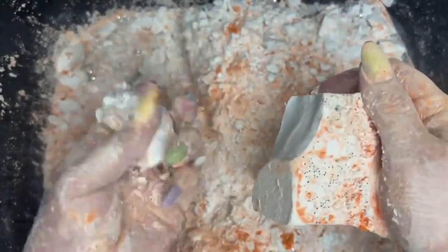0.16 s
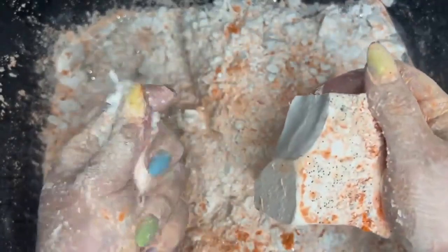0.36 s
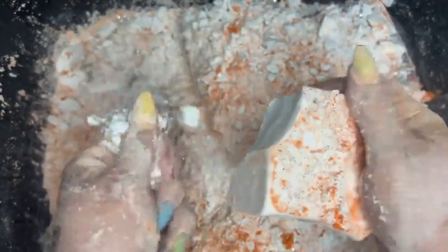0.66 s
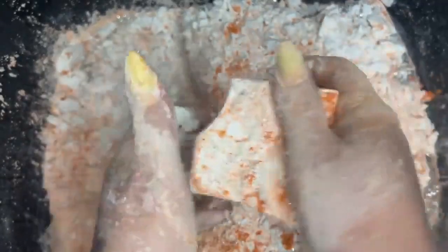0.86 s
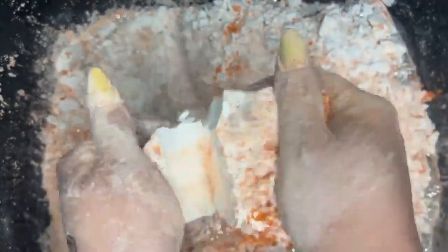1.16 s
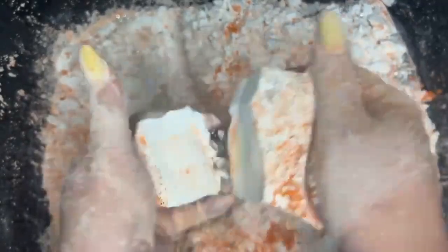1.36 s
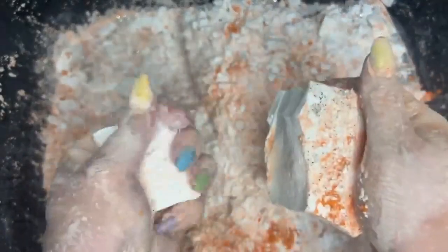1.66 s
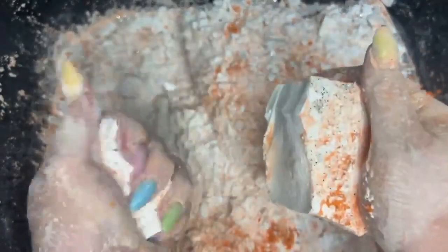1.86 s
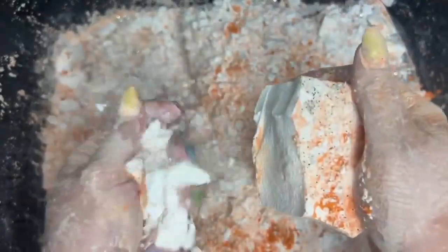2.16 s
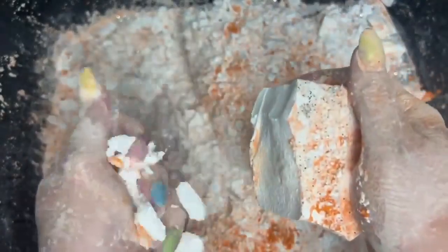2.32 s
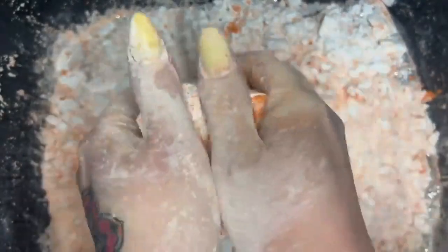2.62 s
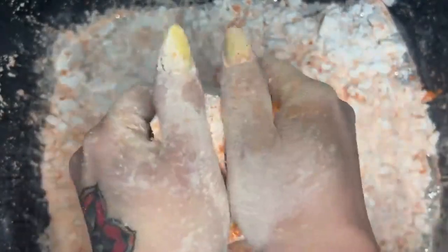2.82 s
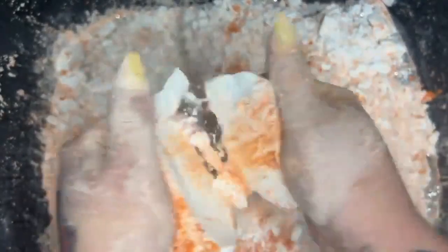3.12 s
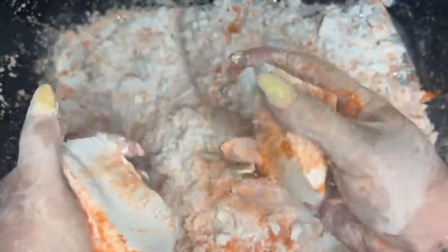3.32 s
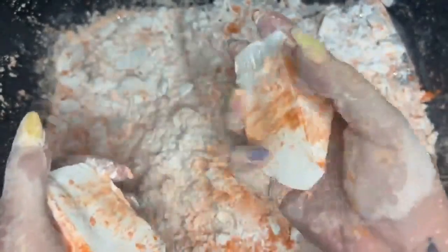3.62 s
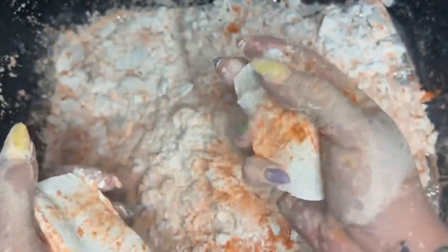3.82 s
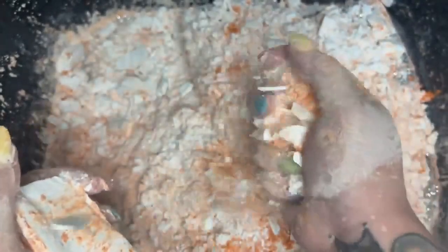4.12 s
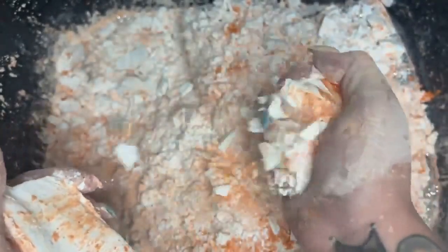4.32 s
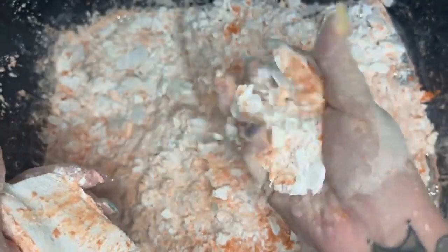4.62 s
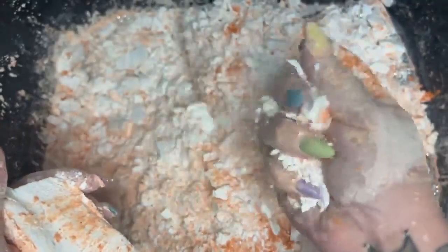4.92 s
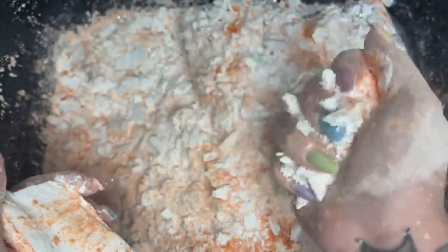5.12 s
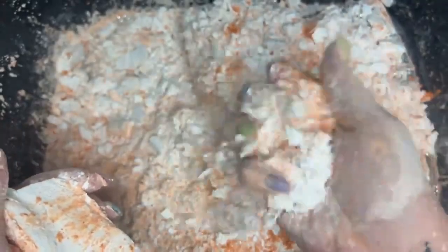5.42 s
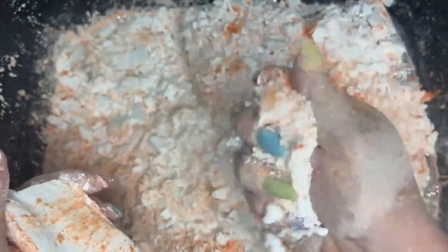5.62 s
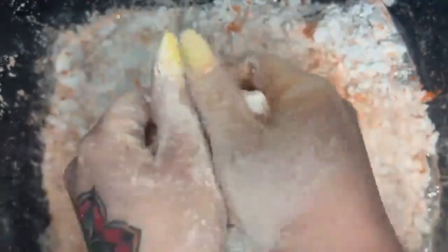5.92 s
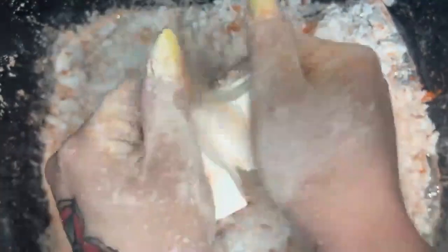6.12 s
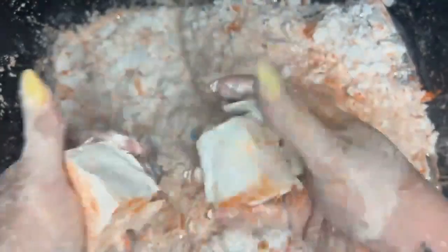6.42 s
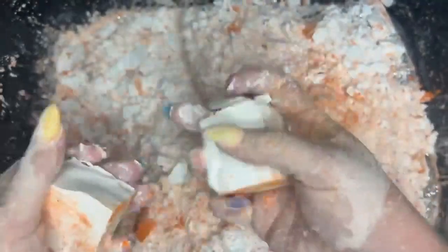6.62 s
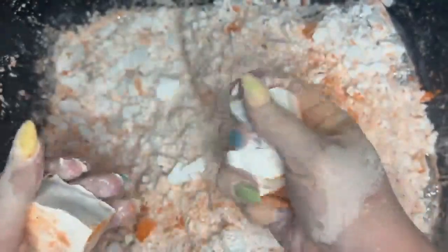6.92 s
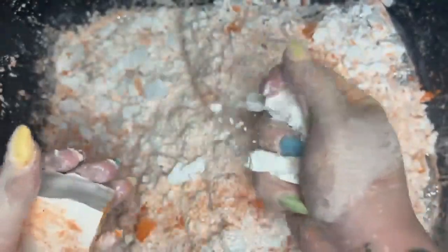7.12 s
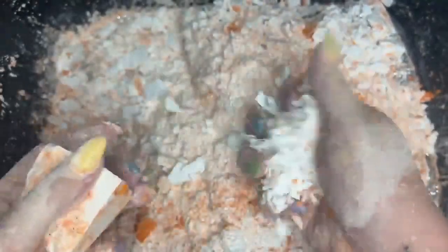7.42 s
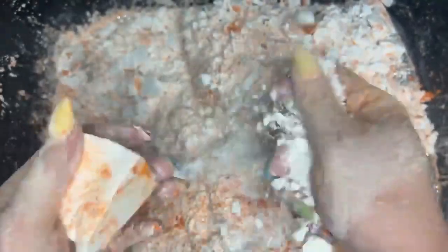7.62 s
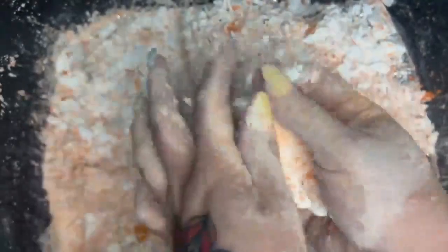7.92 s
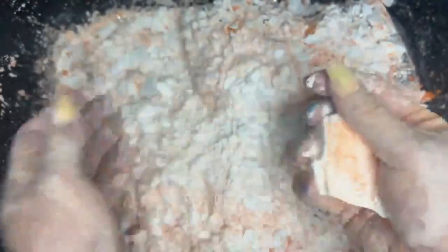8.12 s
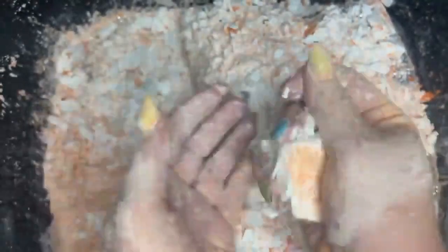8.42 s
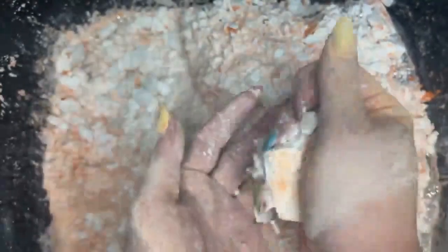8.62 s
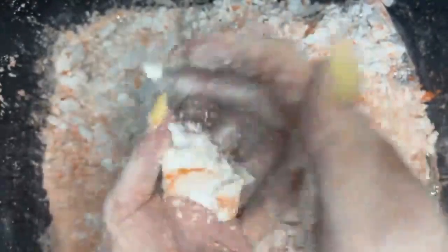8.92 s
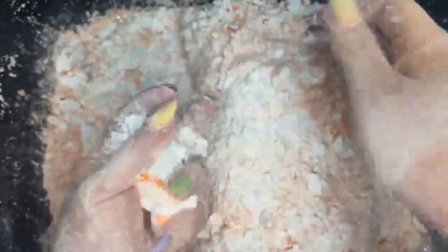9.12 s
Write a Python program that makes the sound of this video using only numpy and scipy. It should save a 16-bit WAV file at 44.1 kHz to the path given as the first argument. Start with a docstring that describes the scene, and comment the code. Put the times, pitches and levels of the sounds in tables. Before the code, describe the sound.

Close stereo sound of brittle chalk being crushed by hand. A few crunches open, a hard snap follows at a second and a half, then more squeezes, a dense crackling run near seven seconds and the sharpest crack just after eight. Powder grinds, skin hisses faintly on dust, and a fan hums low. The whole level dips very briefly four times. Small, nearly dry room.

```python
"""Dry chalk blocks snap and crush in two hands over a tray of powder, heard close in a small room.
Each fracture is a snap with a brief avalanche of smaller breaks that ring the fragment; damped thumps join.
Each squeeze swells and eases, grinding powder and breaking crumbs; faces stick and slip, and skin hisses.
A fan, moving air with narrow resonances, hums low throughout, and the whole level dips briefly four times."""
import sys
import numpy as np
from scipy import signal
from scipy.fft import rfft, irfft, next_fast_len
from scipy.io import wavfile
from scipy.ndimage import uniform_filter1d

SR = 44100
rng = np.random.default_rng(int(sys.argv[2]) if len(sys.argv) > 2 else 0)


def to_wav(s):
    """Save 16-bit WAV."""
    ch = np.atleast_2d(s).T  # columns
    pcm = np.round(np.clip(ch, -1, 1) * 32767)  # PCM
    wavfile.write(sys.argv[1], SR, pcm.astype(np.int16))


N = 408366
TIME = np.arange(N) / SR


def undb(db):
    """Logarithmic level: decibels become an amplitude gain."""
    return 10 ** (np.asarray(db) / 20)


def unit(x):
    """Normalisation of power: scale to rms 1."""
    return x / np.sqrt(np.mean(x ** 2) + 1e-20)


def decay(t, t60_s):
    """Exponential decay: 60 dB are lost in each t60."""
    return np.exp(-np.log(1000) * t / t60_s)


def shape(points, size):
    """Spectral envelope: gain of a (Hz, dB) curve at each bin of a transform, on a log frequency axis."""
    hz, db = np.transpose(points)
    bin_hz = np.arange(size // 2 + 1) * SR / size
    return undb(np.interp(np.log(bin_hz + 1), np.log(hz), db))


def colour(x, points):
    """Linear filtering: multiply the spectrum of a sound by an envelope."""
    size = next_fast_len(len(x))
    return irfft(rfft(x, size) * shape(points, size), size)[:len(x)]


def lowpass(x, hz):
    """Second-order causal low-pass."""
    return signal.sosfilt(signal.butter(2, hz, fs=SR, output="sos"), x)


def band(x, lo_hz, hi_hz, order=2):
    """Causal band-pass."""
    return signal.sosfilt(signal.butter(order, [lo_hz, hi_hz], "bp", fs=SR, output="sos"), x)


def split(x, edges_hz):
    """Complementary filtering: neighbouring zero-phase bands that sum back to the sound above the first edge."""
    above = []
    for hz in edges_hz:
        highpass = signal.butter(3, hz, "hp", fs=SR, output="sos")
        above.append(signal.sosfiltfilt(highpass, x))
    return [a - b for a, b in zip(above, above[1:] + [0])]


def ring(x, hz, width_hz):
    """Resonance: one mode, gain 1 at its centre."""
    return signal.lfilter(*signal.iirpeak(hz, hz / width_hz, fs=SR), x)


def flicker(per_s):
    """Slow random modulation: random levels joined smoothly, rms 1."""
    hold = max(int(SR / per_s), 1)
    steps = np.repeat(rng.standard_normal(N // hold + 1), hold)
    return unit(uniform_filter1d(steps, hold)[:N])


def ticks(per_s, scatter_db):
    """Poisson process: random clicks of very unequal size and either sign, rms 1."""
    sizes = undb(scatter_db * np.minimum(rng.exponential(size=N), 4))
    signs = rng.choice([-1, 1], N)
    return unit(sizes * signs * (rng.random(N) < per_s / SR))


# Stereo width. Each row: frequency in Hz, gain of the side sound in dB.
SIDE_WIDTH = [(110, -46), (190, -34), (330, -9.5), (580, -0.5), (1020, -3), (1800, -14.5), (3180, -5.5),
              (5600, -3.5), (9880, 0.5)]


def spread(mid, side):
    """Decorrelation: left and right from two unrelated sounds, with the bass kept in the centre."""
    return mid + colour(side, SIDE_WIDTH) * np.array([[1], [-1]])


def pan(left_minus_right_db):
    """Level difference between the channels: half the decibels to each, in opposite directions."""
    return undb(np.array([[left_minus_right_db], [-left_minus_right_db]]) / 2)


def add(out, s, sound, pan_db=0):
    """Superposition: mix a short sound in at its time and place."""
    i = int(s * SR)
    part = sound[..., :max(N - i, 0)]
    out[:, i:i + part.shape[-1]] += pan(pan_db) * part


# Spectrum of the fan's moving air. Each row: frequency in Hz, relative density in dB per Hz.
FAN_AIR = [(20, -31), (35, -17.5), (52, -4), (90, -4), (160, 0.5), (205, -8), (260, -8.5), (380, -10.5),
           (480, -14), (540, -17), (740, -22.5), (1050, -31.5), (1250, -31), (4000, -69)]
# Resonances of the fan's drone. Each row: frequency in Hz, width in Hz, rms level in dB.
FAN_DRONE = [(104.7, 5.5, -50), (121.6, 2.46, -45.5), (132.2, 3.94, -43.5), (180.4, 25, -52),
             (234.6, 24, -55), (298, 44, -53.5), (337.8, 41, -54), (452, 27, -62.5), (590.4, 23, -66),
             (901, 22, -71)]


def fan(air_db=-45, steady=0.33, slow_rate=500):
    """Broadband flow noise with narrowband resonances: noise-modulated carriers, their swings partly evened."""
    out = undb(air_db) * unit(colour(rng.standard_normal(N), FAN_AIR))
    slow_time = np.arange(0, next_fast_len(N) / SR, 1 / slow_rate)
    count = len(slow_time)
    for hz, width_hz, db in FAN_DRONE:
        narrow = signal.butter(2, width_hz / 2, fs=slow_rate, output="sos")
        sway = signal.sosfiltfilt(narrow, rng.standard_normal((2, 2 * count)))
        sway = sway[:, count // 2:][:, :count]  # away from the filter's ends
        sway = sway / np.hypot(*sway) ** steady
        a, b = (np.interp(TIME, slow_time, part) for part in sway)
        phase = 2 * np.pi * hz * TIME
        out = out + undb(db) * unit(a * np.cos(phase) + b * np.sin(phase))
    return out


# Spectrum the room gives back. Each row: frequency in Hz, gain in dB.
ROOM_COLOUR = [(150, -10.5), (500, 3.5), (1000, -3.5), (1700, -3.5), (2600, 1), (3400, 4), (4500, 1.5),
               (6500, 3.5), (9500, -3)]


def room_response(t60_s=0.5, treble_t60_s=0.36, early_db=-22.0, early_s=0.01, gap_s=0.0086, tail_db=-20,
                  size=22050):
    """Reverberant decay: early reflections build over a gap, then a tail whose treble dies sooner."""
    t = np.arange(size) / SR
    noise = colour(rng.standard_normal(size), ROOM_COLOUR)
    low, high = split(noise, edges_hz=[150, 4200])
    tail = low * decay(t, t60_s) + high * decay(t, treble_t60_s)
    early = noise * np.exp(-t / early_s) * np.clip(t / gap_s, 0, 1) ** 4
    return (undb(tail_db) * unit(tail) + undb(early_db) * unit(early)) / np.sqrt(2 * size)


def room(x):
    """Convolution with an impulse response: quick reflections off tray and hands, then the room's faint tail."""
    centre = x.mean(axis=0)[None]
    response = spread(room_response(), room_response())
    return signal.fftconvolve(centre, response, axes=1)[:, :N]


# Skin brushing over dusty chalk. Each row: start in seconds, end in seconds, pitch at the start in Hz,
# pitch at the end in Hz, rms level in dB before the catching.
SKIN_RUBS = [(0.342, 0.387, 7740, 6740, -57), (0.794, 0.828, 7500, 8160, -66.5),
             (0.85, 0.97, 2600, 2300, -59.5), (1.267, 1.295, 7700, 7300, -66),
             (1.345, 1.405, 7000, 7800, -69), (1.472, 1.523, 7300, 6760, -55.5),
             (2.187, 2.236, 6040, 6470, -55.5), (2.58, 2.716, 2000, 2700, -59.5),
             (3.07, 3.108, 5300, 5600, -65), (3.122, 3.205, 6000, 6770, -73),
             (3.174, 3.249, 1900, 1710, -70), (3.291, 3.442, 6960, 7900, -69.5),
             (3.485, 3.59, 6200, 7200, -70), (6.14, 6.22, 7600, 7940, -71), (6.277, 6.343, 3600, 2820, -68),
             (6.469, 6.518, 6640, 7600, -62.5), (7.867, 7.884, 5930, 6000, -51.5)]


def rubs(width_hz=1100, catch_db=3):
    """Friction noise: a soft narrow hiss, low-passed noise on a gliding carrier, that catches as it goes."""
    out = np.zeros((2, N))
    catch = undb(catch_db * flicker(55))
    for start, end, from_hz, to_hz, db in SKIN_RUBS:
        u = np.linspace(0, 1, max(int((end - start) * SR), 64))
        grain = lowpass(rng.standard_normal((2, len(u))), width_hz)
        glide_hz = from_hz + (to_hz - from_hz) * u
        carrier = np.cos(2 * np.pi * np.cumsum(glide_hz) / SR)
        hiss = band(grain * carrier, 1000, 9300, order=6) * np.sin(np.pi * u)
        add(out, start, undb(db) * unit(spread(*hiss)))
    return out * catch


# Chalk faces sliding under pressure. Each row: start in seconds, end in seconds, slips per second at the
# start, pitch in Hz, width of each resonance in Hz, rms level in dB, unevenness of the slips from 0 to 1.
SLIDING_FACES = [(0.171, 0.234, 260, 2460, 795, -49.5, 0.3), (4.073, 4.163, 300, 3020, 1520, -47, 0.04)]


def squeaks(quicken=1.3, scatter_db=1.5, rasp=0.025, count=80):
    """Stick-slip friction: ever faster slips excite a resonance, and the creak swells and fades."""
    out = np.zeros((2, N))
    for start, end, per_s, hz, width_hz, db, uneven in SLIDING_FACES:
        u = np.linspace(0, 1, max(int((end - start) * SR), 64))
        late, loud = rng.standard_normal((2, count))
        turns = np.cumsum(per_s * quicken ** u) / SR
        slip_at = np.searchsorted(turns, np.cumsum(np.exp(uneven * late)))
        slips = np.bincount(slip_at, undb(scatter_db * loud), len(u) + 1)[:len(u)]
        slips = slips + rasp * rng.standard_normal(len(u))
        resonant = ring(ring(slips, hz, width_hz), hz, width_hz)
        creak = band(resonant, 900, 6500) * np.sqrt(np.abs(np.sin(np.pi * u)))
        add(out, start, undb(db) * unit(creak))
    return out


# Squeezes of the hand. Each row: firmest moment in seconds, tightening time in seconds, letting-go time in
# seconds, grinding level in dB, crumb level in dB before the offset all crumbs share.
HAND_SQUEEZES = [(0.191, 0.1, 0.068, -56, -59), (0.378, 0.088, 0.19, -60.5, -58),
                 (0.931, 0.11, 0.027, -71, -65), (1.591, 0.11, 0.13, -52, -50.5),
                 (1.97, 0.092, 0.2, -59.5, -61), (2.18, 0.13, 0.06, -64, -57.5),
                 (2.697, 0.23, 0.16, -59, -60), (3.119, 0.051, 0.16, -67, -68),
                 (3.37, 0.15, 0.075, -66, -73), (3.53, 0.046, 0.08, -69, -79),
                 (3.959, 0.095, 0.19, -53.5, -50), (4.309, 0.15, 0.14, -63.5, -63),
                 (4.65, 0.089, 0.21, -57, -51.5), (4.929, 0.13, 0.26, -62.5, -59.5),
                 (5.619, 0.086, 0.13, -64, -59.5), (6.24, 0.25, 0.26, -73, -76),
                 (6.63, 0.17, 0.037, -67.5, -57), (6.849, 0.077, 0.13, -52.5, -45.5),
                 (7.07, 0.11, 0.15, -57.5, -54), (7.521, 0.23, 0.18, -57, -54),
                 (7.76, 0.089, 0.065, -77, -71), (7.919, 0.084, 0.17, -69.5, -57.5),
                 (8.329, 0.17, 0.074, -61, -60), (8.732, 0.12, 0.28, -62.5, -61),
                 (9.12, 0.2, 0.14, -59.5, -54.5)]


def pressure():
    """Addition of powers: each squeeze swells to its level and eases off along a bell curve."""
    t, power = np.linspace(0, N / SR, N // 100), 0
    for s, rise_s, fall_s, db, _ in HAND_SQUEEZES:
        bell = np.exp(-((t - s) / np.where(t < s, rise_s, fall_s)) ** 2)
        power = power + (undb(db) * bell) ** 2
    return np.interp(TIME, t, np.sqrt(power))


# Spectrum of grinding powder. Each row: frequency in Hz, relative density in dB per Hz.
POWDER_COLOUR = [(350, -20), (700, -6), (1000, 5.5), (1200, -0.5), (1700, 0.5), (2750, 2), (3400, -3.5),
                 (4000, -3.5), (4800, -6.5), (5700, -4), (7000, -6.5), (8800, -6.5), (9600, -15),
                 (10400, -39.5), (12000, -53)]


def grains():
    """Granular noise: fine grains and a few coarser crumbs break over a smooth rub of dust."""
    breaking = ticks(per_s=1800, scatter_db=4) + .65 * ticks(per_s=70, scatter_db=3.5)
    dust = rng.standard_normal(N)
    return colour(breaking + dust, POWDER_COLOUR)


def grinding(rest_db=-63, rest_fine_db=-79.5, fine_db=-3.0, stir_db=1, stir_fine_db=6.5, grit_db=-2.5):
    """Pressure-driven friction: grip sets loudness and brightness over a resting stir; grit crackles if firm."""
    grip = pressure()
    jerks, stir = flicker(30), flicker(12)
    bands = split(spread(grains(), grains()), edges_hz=[300, 1400, 2300, 3300, 4500, 6000, 7800])
    bands = [part * undb(1.7 * flicker(22)) for part in bands]  # each band flickers by itself
    low = sum(bands[:4]) * undb(1.6 * jerks)
    high = sum(bands[4:]) * undb(2.5 * jerks)
    # resting fingers and grip add as powers
    body = unit(low) * np.hypot(undb(rest_db + stir_db * stir), grip)
    fine = unit(high) * np.hypot(undb(rest_fine_db + stir_fine_db * stir), undb(fine_db) * grip)
    crackle = [colour(ticks(per_s=260, scatter_db=4), CHALK_COLOUR) for _ in range(2)]
    grit = undb(grit_db) * unit(spread(*crackle)) * grip * np.sqrt(grip / grip.max())
    return body + fine + grit


# Blocks giving way between the palms. Each row: start in seconds, pitch in Hz, peak level in dB,
# 60 dB decay time in seconds, left minus right in dB.
PALM_THUMPS = [(0.361, 161, -28, 0.018, 1), (0.9707, 357, -14, 0.016, 3), (2.7262, 334, -11.5, 0.019, 3.5),
               (2.734, 90, -25, 0.029, 0), (2.744, 200, -27, 0.019, 0), (2.767, 196, -28, 0.014, 3),
               (5.952, 350, -21.5, 0.021, 4), (5.9728, 370, -23, 0.024, 8), (6.735, 284, -27.5, 0.013, 4),
               (6.798, 195, -33, 0.027, 0), (8.293, 407, -31, 0.013, 1)]


def thumps(push_s=0.0014, size=4096):
    """Damped oscillation: the two halves kick against the palms, which damp them within a few cycles."""
    out, t = np.zeros((2, N)), np.arange(size) / SR
    push = (1 - np.exp(-t / push_s)) ** 2
    for s, hz, db, t60_s, pan_db in PALM_THUMPS:
        swing = np.sin(2 * np.pi * hz * t) * decay(t, t60_s) * push
        add(out, s, undb(db) * swing / np.abs(swing).max(), pan_db)
    return out


# Spectrum of one break in chalk. Each row: frequency in Hz, relative density in dB per Hz.
CHALK_COLOUR = [(300, -20.5), (600, -0.5), (900, 1), (1200, -1.5), (1550, -2), (2700, -4), (3900, -6.5),
                (5000, -8.5), (5800, -7.5), (8300, -11.5), (9300, -15), (10500, -39.5)]


def snap(size=512):
    """Minimum phase: folding the cepstrum gives the causal click of one break in chalk."""
    cepstrum = irfft(np.log(shape(CHALK_COLOUR, size)))
    cepstrum[1:size // 2] *= 2
    cepstrum[size // 2 + 1:] = 0
    return irfft(np.exp(rfft(cepstrum)))


LEAD = 256  # samples of lead-in before each snap
# Modes of a fragment. Each row: multiple of its ring frequency, gain in dB.
MODES = [(1, 5.5), (1.57, -5.5), (2.31, -5.5)]


def fracture(level_db, hz, body_db, treble_db, length_s, breaks_per_s=4200, follow=0.68, stretch=2.6,
             lead_in_db=-21, lead_in_s=0.0043, crumbs_db=-27, crumbs_s=0.02, ring_q=6.2, reach=1.534,
             side_db=-3.5, small_hz=1500, first_hz=4500, first_db=3, size=2048):
    """Brittle avalanche: a faint crackle leads in, a snap sets off breaks that ring the fragment, crumbs tick."""
    t = (np.arange(size) - LEAD) / SR
    sizes, chance = rng.standard_normal((2, size)), rng.random((2, size))
    avalanche = np.exp(-(t / (stretch * length_s)) ** 2 / 2)
    avalanche = avalanche + undb(crumbs_db) * np.exp(-np.abs(t) / crumbs_s)
    lead_in = undb(lead_in_db) * np.exp(-np.abs(t) / lead_in_s)
    breaks = follow * sizes * (chance < breaks_per_s / SR) * np.where(t < 0, lead_in, avalanche)
    # small breaks are thin and scatter to the sides
    breaks = signal.lfilter(*signal.butter(1, small_hz, "hp", fs=SR), breaks)
    # the first snap is full and straight ahead
    first = signal.lfilter(*signal.butter(1, first_hz, fs=SR), 1. * (t == 0))
    breaks[0] += undb(first_db) * first
    burst = signal.fftconvolve(breaks, snap()[None], axes=1)[:, :size]
    burst = burst + sum(undb(db) * ring(burst, multiple * hz, hz / ring_q) for multiple, db in MODES)
    treble_hz = np.clip(reach * hz, 2500, 5500)  # a smaller fragment rings further up
    parts = split(burst, edges_hz=[590, 1400, treble_hz])
    # each band's mid energy equals that of rms 1 held for 10 ms
    low, middle, high = (part / np.sqrt(np.sum(part[0] ** 2) / (.01 * SR)) for part in parts)
    mid, side = undb(level_db) * (undb(body_db) * low + middle + undb(treble_db) * high)
    return spread(mid, undb(side_db) * side)


def crumbs(crumb_db=-5, scatter_db=2.6, edge_db=-7, hz=2100, octaves=0.42, body_db=-11.5,
           body_db_per_octave=11.5, treble_db=-3, treble_scatter_db=3, length_s=0.0007, count=12):
    """Size scaling: squeezes break pieces, loudest where firmest; a bigger one rings lower with more body."""
    out = np.zeros((2, N))
    for s, rise_s, fall_s, _, db in HAND_SQUEEZES:
        # -1 closing, 0 firmest, 1 let go
        stages = 2 * (np.arange(count) + rng.random(count)) / count - 1
        chances = np.clip(rng.standard_normal((count, 3)), -2, 2)
        for u, (loud, small, bright) in zip(stages, chances):
            octaves_up = octaves * small
            tick = fracture(crumb_db + db + edge_db * u ** 2 + scatter_db * loud,
                            hz * 2 ** octaves_up,
                            body_db - body_db_per_octave * octaves_up,
                            treble_db + treble_scatter_db * bright,
                            length_s)
            at_s = s + u * (rise_s if u < 0 else fall_s)
            add(out, max(at_s - LEAD / SR, 0), tick)
    return out


# The loud fractures. Each row: time of the snap in seconds, level of the middle band in dB, ring of the
# fragment in Hz, body relative to the level in dB, treble relative to the level in dB,
# length of the avalanche in seconds before its stretch.
LOUD_FRACTURES = [(0.22, -32, 2320, -6.5, -13.0, 0.0007), (0.258, -50, 2260, -3, -3.5, 0.00065),
                  (0.309, -55, 2000, 0, -3.5, 0.00086), (0.3525, -53.0, 2100, 1, 4, 0.0017),
                  (0.3648, -47, 3030, -3, -6, 0.001), (0.376, -57, 2950, -17, 0, 0.002),
                  (0.4355, -37, 2250, -12, -5.5, 0.00045), (0.484, -58.5, 1480, -2, 0, 0.0015),
                  (0.521, -56, 1370, 3, 2.5, 0.0011), (0.9444, -60.0, 1970, -14, -3, 0.0009),
                  (0.9696, -29, 950, 4, -7, 0.0006), (0.9917, -36.5, 1830, -12, -13, 0.0008),
                  (1.4132, -58, 2330, 3, 13.5, 0.0012), (1.5217, -22.5, 2650, -5.5, -6, 0.00084),
                  (1.526, -38, 2650, -11, 0, 0.00082), (1.5388, -46.0, 2760, -13, -3, 0.0012),
                  (1.547, -53, 3480, 0, 3, 0.001), (1.555, -32.5, 3500, -7, -3.5, 0.0015),
                  (1.5902, -40, 2500, -9.5, -11, 0.001), (1.6003, -45, 2220, -13, 1.5, 0.0012),
                  (1.618, -43.5, 2100, -8, -5, 0.0016), (1.66, -50, 3750, -19, 4, 0.00041),
                  (1.6665, -44.5, 2270, -6, 6, 0.0006), (1.677, -51, 4200, -14, 0.0, 0.00091),
                  (1.686, -48, 3700, -22, -6.0, 0.0036), (1.9032, -56, 2120, -8, -20, 0.0008),
                  (1.94, -66, 2840, -9, 9, 0.0005), (2.123, -43.0, 2940, -6.5, 0, 0.0007),
                  (2.1745, -51.5, 3830, -11, -6, 0.0006), (2.191, -56, 2720, 1, -4.0, 0.0023),
                  (2.219, -61, 2800, -6, 7, 0.0015), (2.427, -56.5, 1380, 6, 2, 0.0012),
                  (2.645, -59, 1940, 0, -9, 0.0009), (2.724, -33.5, 1660, -1, 1, 0.001),
                  (2.7608, -45, 2330, -6, -8, 0.0012), (2.765, -35.5, 2430, -7, -12, 0.0011),
                  (2.772, -54, 2390, -16.0, 4.5, 0.0018), (2.7812, -50, 2280, 1, -8, 0.001),
                  (2.821, -48, 2420, -17, -17, 0.00061), (3.032, -62, 1420, 2, -15, 0.0014),
                  (3.676, -64, 3200, -10, -4, 0.00065), (3.8, -45.0, 2970, 0, -2, 0.0012),
                  (3.8294, -48, 3690, -9.5, 2.5, 0.0009), (3.8408, -44, 1030, 9.5, 10, 0.0014),
                  (3.8566, -40.5, 1010, 7.5, 8, 0.0012), (3.891, -27, 1480, -3.5, 2, 0.0011),
                  (3.9067, -32.5, 2250, -6, -0.5, 0.00064), (3.924, -41, 3840, -10, -8.5, 0.00045),
                  (3.935, -50, 2900, -10, -1, 0.0008), (3.9569, -33, 2940, -15, -11, 0.00047),
                  (3.972, -46, 3930, -12, -8, 0.001), (4.016, -52.5, 3920, -17.5, 2, 0.00088),
                  (4.042, -54.0, 2590, -15, -12.5, 0.00045), (4.1585, -35, 1530, -4.0, 0.5, 0.00071),
                  (4.164, -44, 2370, -5, -0.5, 0.0018), (4.28, -40.5, 2300, -9, -11.5, 0.00035),
                  (4.596, -47, 2580, -13, -14, 0.00046), (4.6108, -49, 2670, -7.0, -4.0, 0.0009),
                  (4.6336, -43.5, 3220, -18, -1, 0.0006), (4.668, -53.5, 3230, -7.5, -21, 0.0007),
                  (4.678, -53, 3080, -9.5, -17, 0.0006), (4.6932, -45, 965, 6.5, 2, 0.00088),
                  (4.8056, -55, 1490, -5.5, 5, 0.00083), (4.824, -56.5, 1440, -2.5, 2.0, 0.00094),
                  (4.9, -39.5, 2250, -4, -14, 0.0011), (4.922, -53, 2200, -4, -4, 0.0006),
                  (4.937, -57, 1620, 3.0, -0.5, 0.0008), (4.967, -46.5, 2450, -6, -13, 0.00055),
                  (5.0815, -51, 1580, -1, 2, 0.00085), (5.535, -35, 1600, 0, 5, 0.00096),
                  (5.635, -44, 1550, 0.5, 1, 0.00084), (5.6753, -57.5, 1430, 1.5, -6, 0.00062),
                  (5.778, -53.5, 1860, -2.5, -11, 0.0019), (5.9489, -33.5, 2360, -1, -2.5, 0.0054),
                  (5.9608, -31.5, 2940, -16, -13.0, 0.00073), (5.971, -26.5, 1980, 2.5, -0.5, 0.0015),
                  (6.6104, -45, 3050, -10.5, -7, 0.0012), (6.6524, -63, 1450, 4, 11, 0.00076),
                  (6.691, -41, 2710, -10, -15, 0.00055), (6.733, -35, 1420, 2.5, 3.5, 0.00071),
                  (6.745, -49, 2900, -18, -1, 0.0011), (6.7607, -37.5, 2600, 2.5, -4, 0.00091),
                  (6.7733, -28, 2830, -13, -8, 0.0005), (6.785, -45, 2900, -12, -7, 0.001),
                  (6.794, -38, 4010, -26.0, -4.0, 0.0016), (6.8004, -34, 3790, -20, -12, 0.0022),
                  (6.814, -39, 2430, -6.5, -9.0, 0.0015), (6.833, -36.5, 2960, -13.5, -12, 0.00043),
                  (6.844, -48, 2800, -10, -11, 0.0008), (6.853, -49.5, 1380, -3, -2, 0.0013),
                  (6.862, -50, 2600, -10, -8, 0.0008), (6.8795, -41.5, 2930, -12, -7, 0.0014),
                  (6.8972, -40, 2630, -11, 2.5, 0.0027), (6.9066, -32, 3700, -13.5, -6, 0.00055),
                  (6.911, -34.5, 2950, -10, -11.5, 0.0018), (6.9307, -36, 2850, -21, -15, 0.00074),
                  (6.936, -40, 2620, -18, -6, 0.0014), (7.0, -42.5, 3400, -1, -5, 0.0015),
                  (7.0262, -43.5, 1540, 2.5, 8.5, 0.001), (7.058, -49.0, 4030, -7.0, -1, 0.0009),
                  (7.072, -52, 1530, -1.5, 5, 0.0009), (7.0774, -42, 2970, -16.0, -9.0, 0.00071),
                  (7.142, -51, 2100, -14, -1.5, 0.0028), (7.5438, -50.5, 3270, -11, -9.0, 0.00083),
                  (7.62, -60.5, 1030, 16.5, -3.5, 0.00039), (7.6387, -57.5, 2380, 1, -20, 0.0009),
                  (7.89, -53, 2550, -16, -7.5, 0.00081), (7.915, -54.0, 2940, -14.0, -3, 0.00088),
                  (7.941, -56.0, 2310, -14, -1, 0.00091), (8.035, -51, 3680, -9, -5.5, 0.0017),
                  (8.147, -39.0, 3230, -34, -4.5, 0.0014), (8.23, -53, 3060, -19, -6, 0.0007),
                  (8.2623, -51, 3010, -26.5, -1.5, 0.00056), (8.293, -19.5, 2700, -16, -7, 0.00048),
                  (8.294, -23, 3700, -17, -9.5, 0.00068), (8.2965, -38.5, 940, -1, -1, 0.0012),
                  (8.3343, -47, 1490, 3, -4, 0.0007), (8.345, -48, 3240, -8.0, -17, 0.00093),
                  (8.369, -63.5, 2910, -7.0, 12, 0.001), (8.391, -55, 1440, 3, -3, 0.0015),
                  (8.419, -52.5, 2580, -8, -0.5, 0.00091), (8.4977, -54.5, 2310, -10, 1, 0.00068),
                  (8.7848, -61.5, 4100, -13.0, 9.5, 0.001), (8.9648, -46.0, 2260, -13, -5.0, 0.001),
                  (8.976, -52, 2450, -12, -8.5, 0.0012), (9.0133, -48, 1050, 1.0, 2, 0.0021),
                  (9.053, -57, 2450, -14, 2, 0.00069), (9.0813, -43.0, 2630, -6, 1, 0.00058),
                  (9.1008, -55.0, 1010, 7, 10.5, 0.0012), (9.123, -50.0, 3700, -14, 1, 0.002),
                  (9.134, -48.5, 2350, -7, 2.5, 0.003), (9.18, -60.0, 1390, 0.5, 4.5, 0.00054),
                  (9.2501, -42, 2700, -9, -3.5, 0.00073)]


def cracks():
    """Brittle fracture: the blocks and their larger pieces break."""
    out = np.zeros((2, N))
    for s, *settings in LOUD_FRACTURES:
        add(out, s - LEAD / SR, fracture(*settings))
    return out


def scene(hum_pan_db=1.08):
    """Superposition of sources: the chalk and its room over the fan."""
    chalk = cracks() + crumbs() + thumps() + squeaks() + rubs()
    hum = spread(fan(), fan()) * pan(hum_pan_db)
    return chalk + room(chalk) + grinding() + hum


# Brief dips of the whole level. Each row: lowest moment in seconds, then the times in seconds of a full
# linear fade down and back up; a floor cuts both short.
LEVEL_DIPS = [(0.609, 0.037, 0.026), (2.478, 0.026, 0.022), (5.876, 0.043, 0.046), (7.846, 0.043, 0.024)]


def record(dry, dip_db=-21, hiss_db=-79, top_hz=10400):
    """Gain, saturation and band limit: the level dips over faint hiss, peaks are rounded, the top is cut."""
    gain = 1
    for s, fade_s, back_s in LEVEL_DIPS:
        slope = np.maximum((s - TIME) / fade_s, (TIME - s) / back_s)
        gain = gain * np.clip(slope, undb(dip_db), 1)
    hiss = undb(hiss_db) * unit(band(rng.standard_normal((2, N)), 1000, 8000, order=6))
    rounded = np.tanh(dry * gain + hiss)
    return signal.sosfilt(signal.butter(10, top_hz, fs=SR, output="sos"), rounded)


dry = scene()
out = record(dry)
to_wav(out)
```